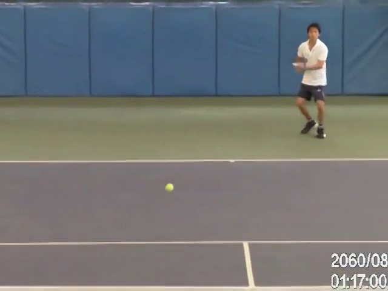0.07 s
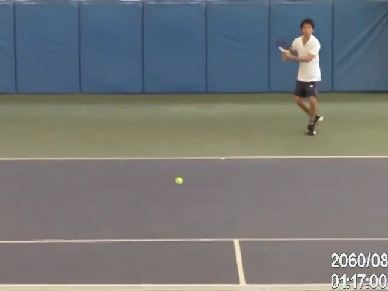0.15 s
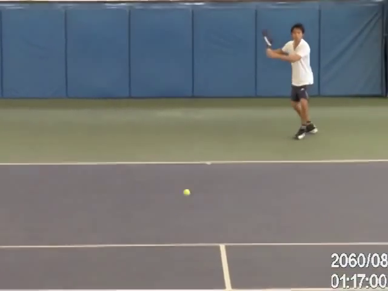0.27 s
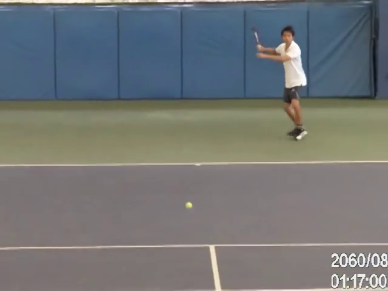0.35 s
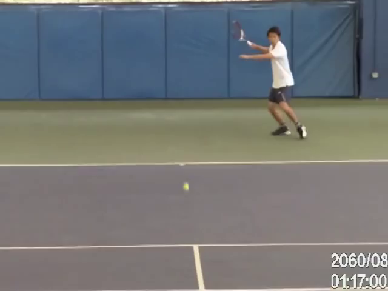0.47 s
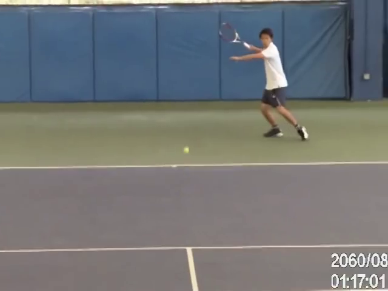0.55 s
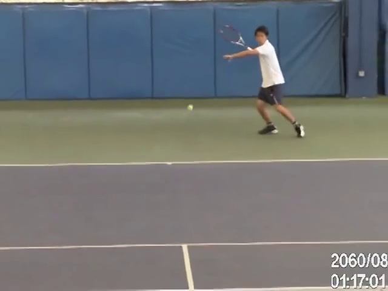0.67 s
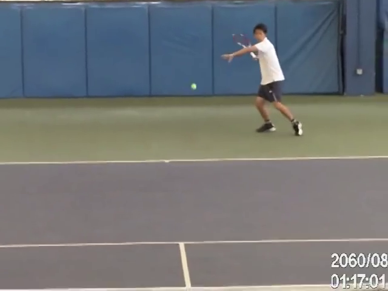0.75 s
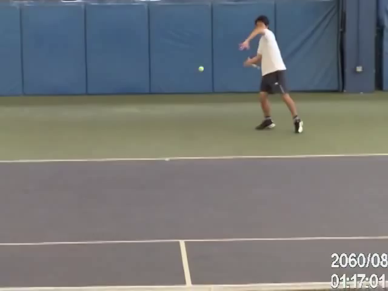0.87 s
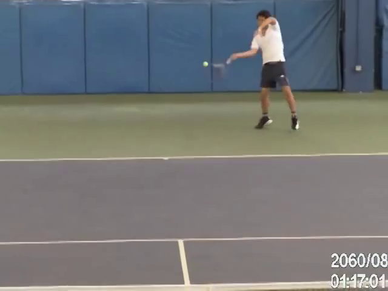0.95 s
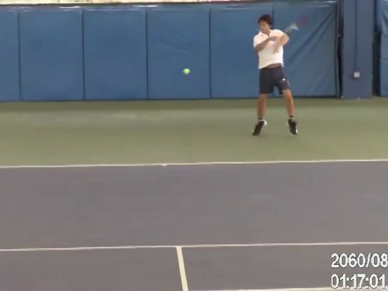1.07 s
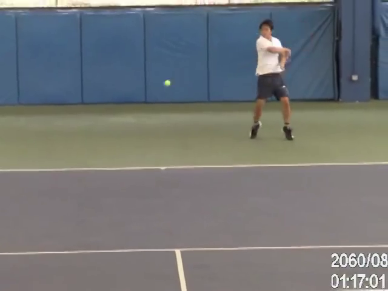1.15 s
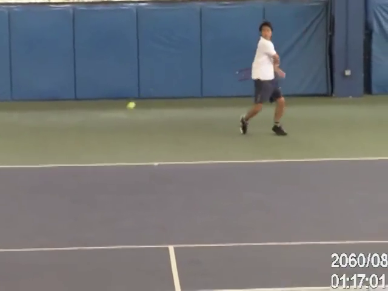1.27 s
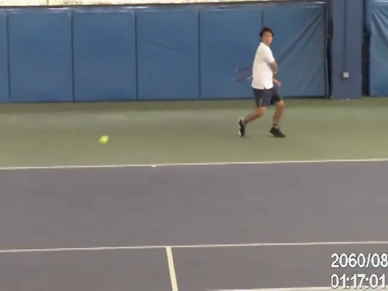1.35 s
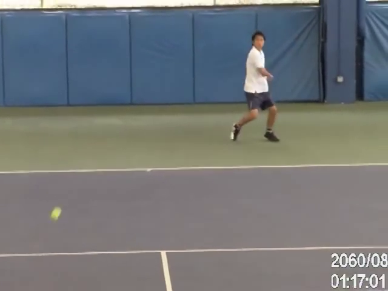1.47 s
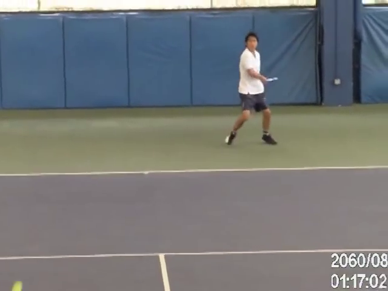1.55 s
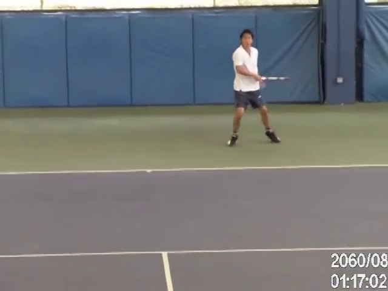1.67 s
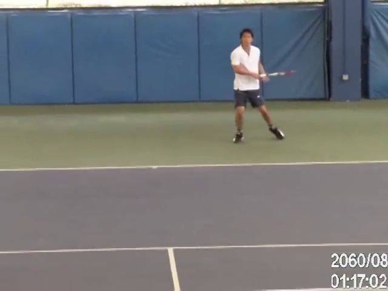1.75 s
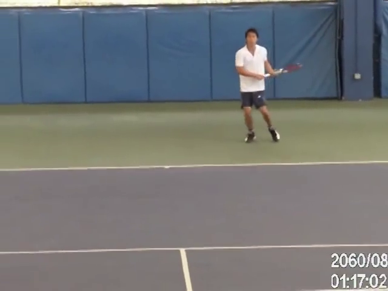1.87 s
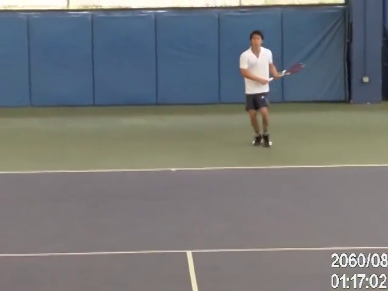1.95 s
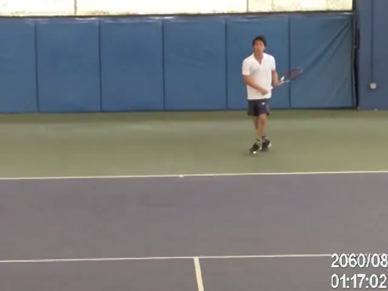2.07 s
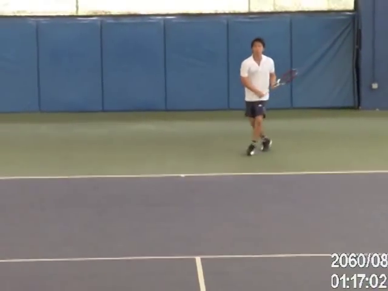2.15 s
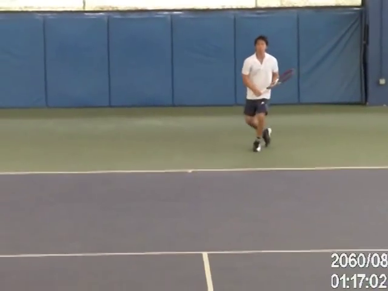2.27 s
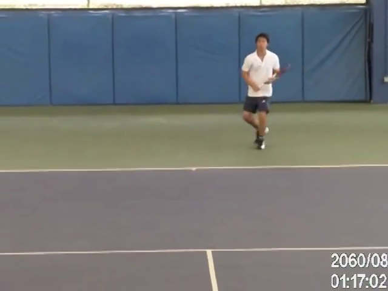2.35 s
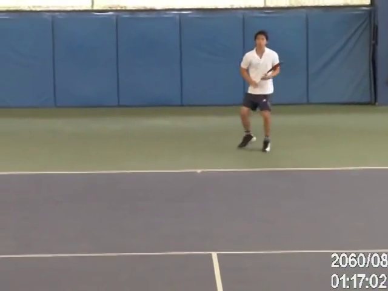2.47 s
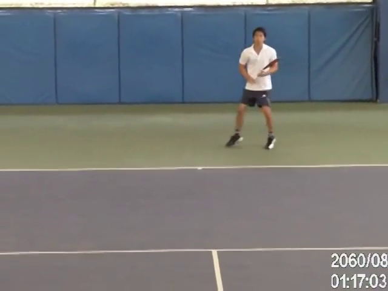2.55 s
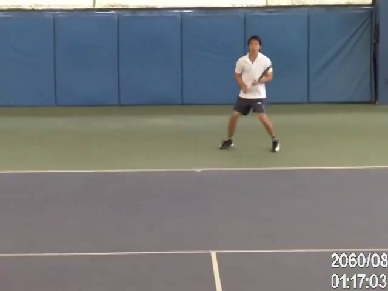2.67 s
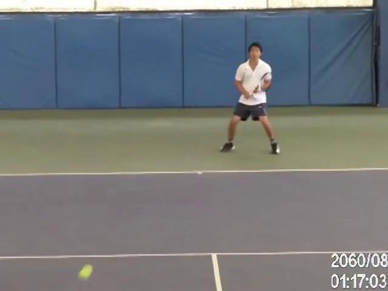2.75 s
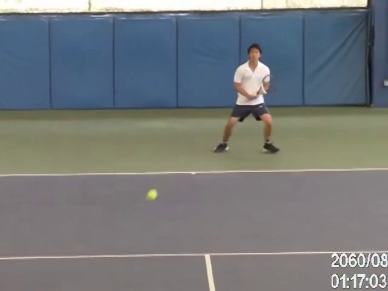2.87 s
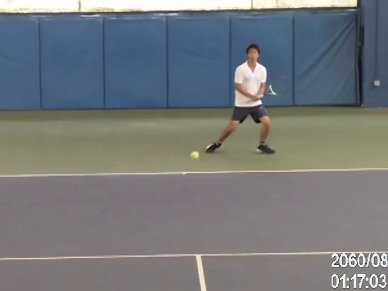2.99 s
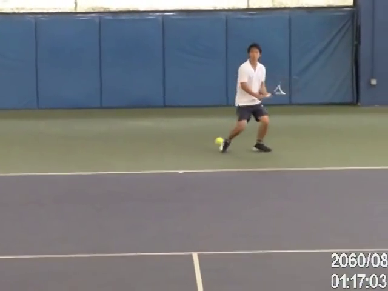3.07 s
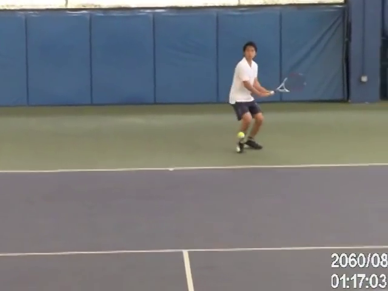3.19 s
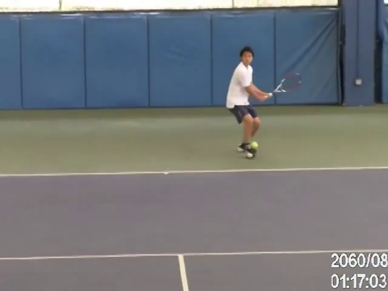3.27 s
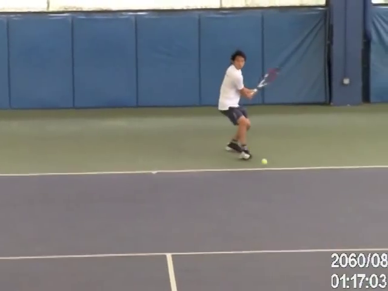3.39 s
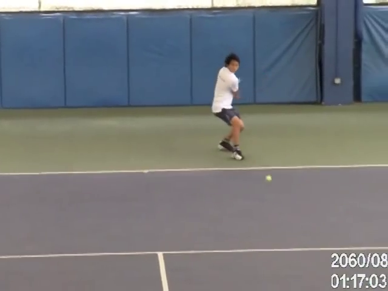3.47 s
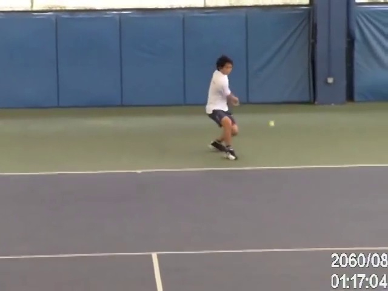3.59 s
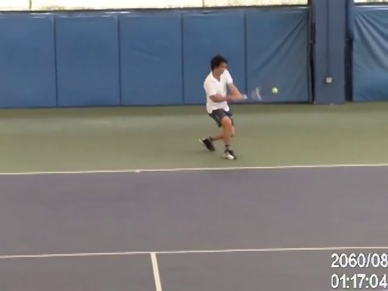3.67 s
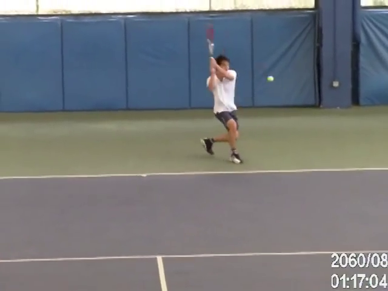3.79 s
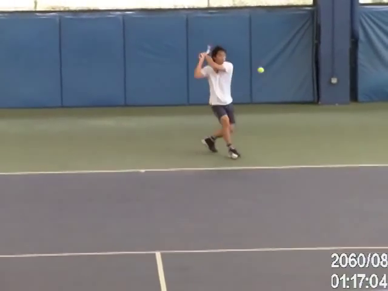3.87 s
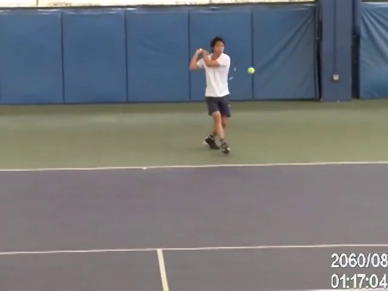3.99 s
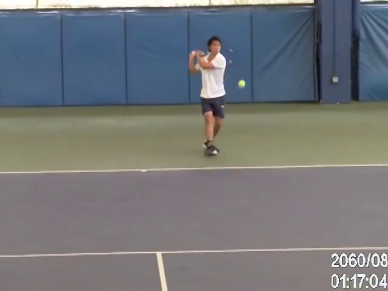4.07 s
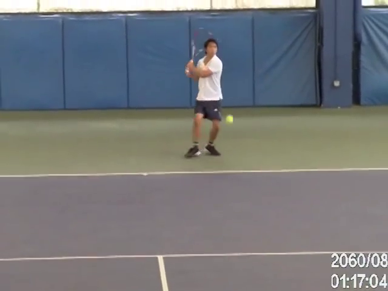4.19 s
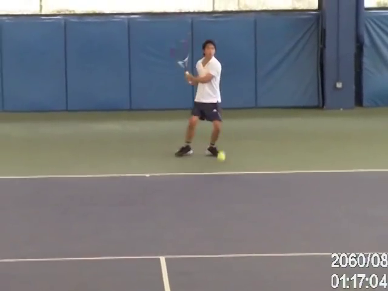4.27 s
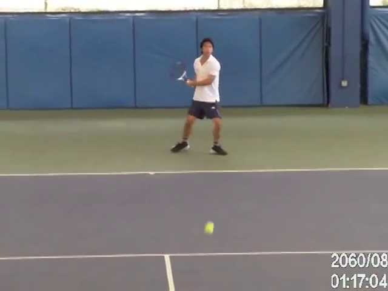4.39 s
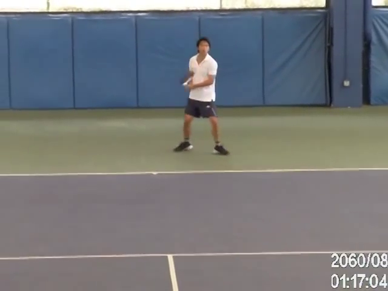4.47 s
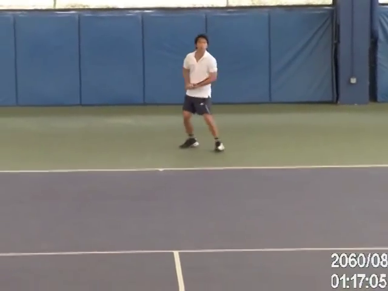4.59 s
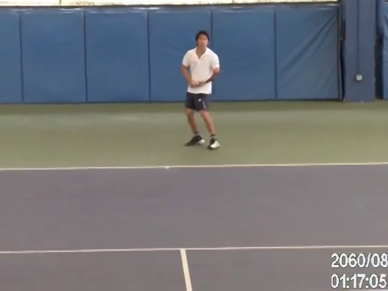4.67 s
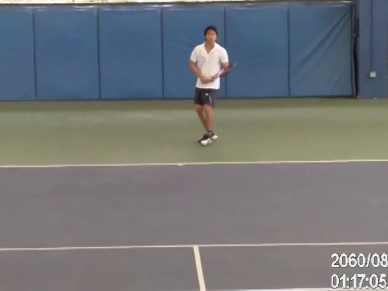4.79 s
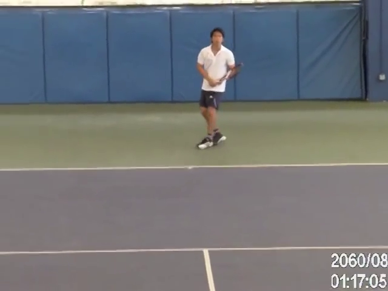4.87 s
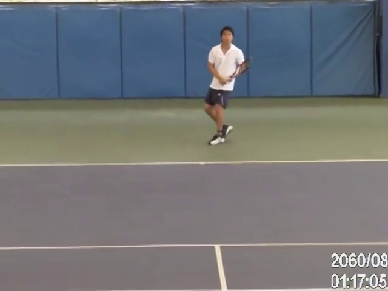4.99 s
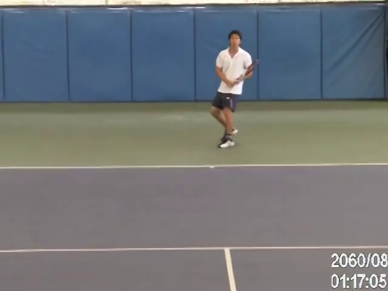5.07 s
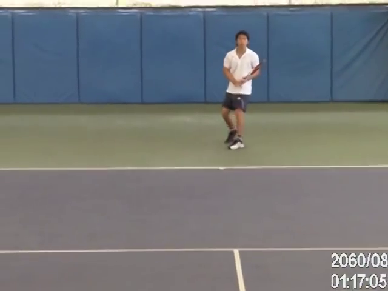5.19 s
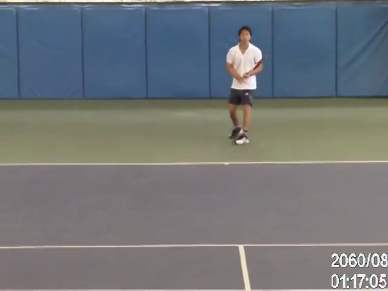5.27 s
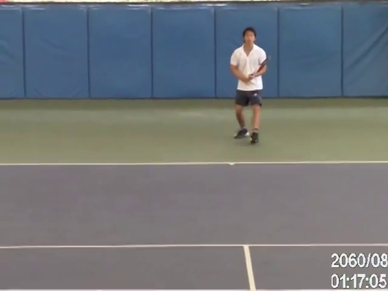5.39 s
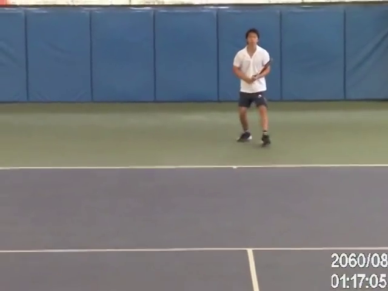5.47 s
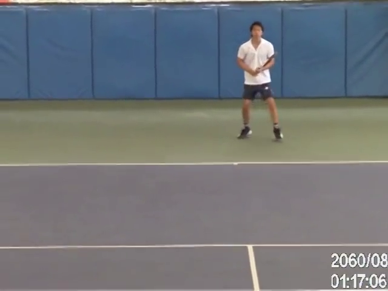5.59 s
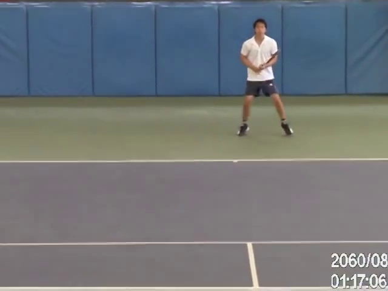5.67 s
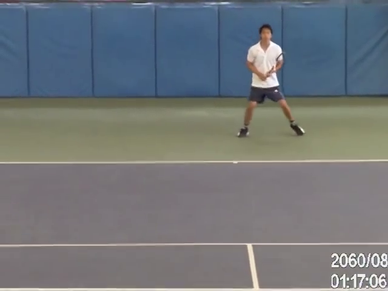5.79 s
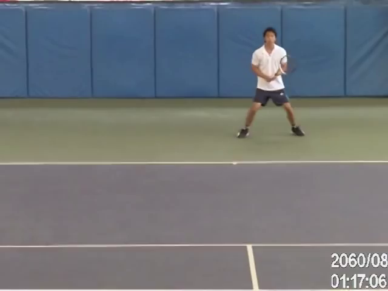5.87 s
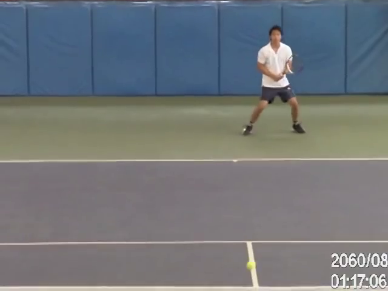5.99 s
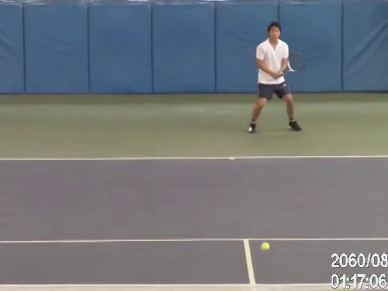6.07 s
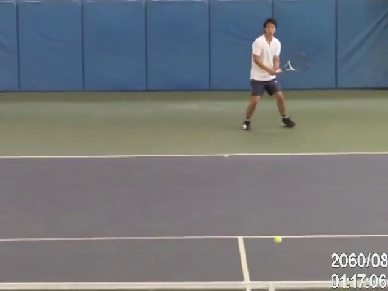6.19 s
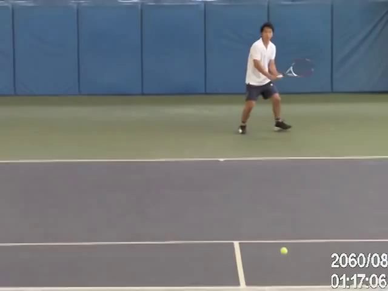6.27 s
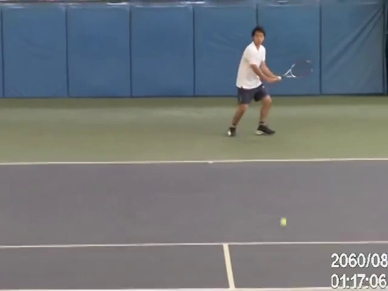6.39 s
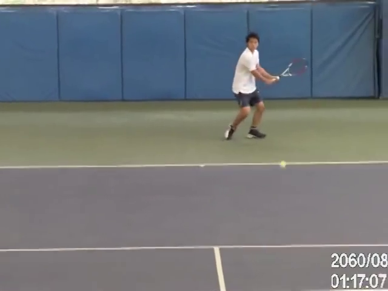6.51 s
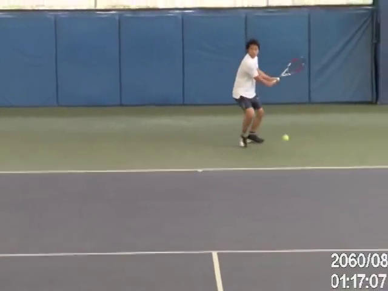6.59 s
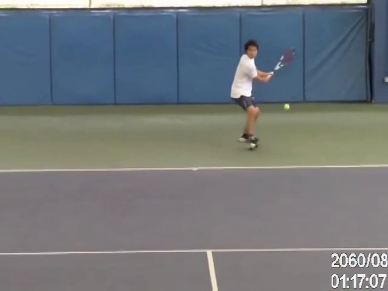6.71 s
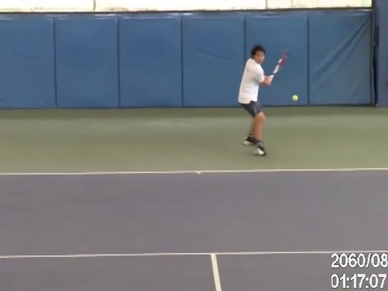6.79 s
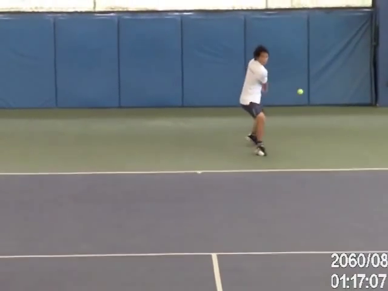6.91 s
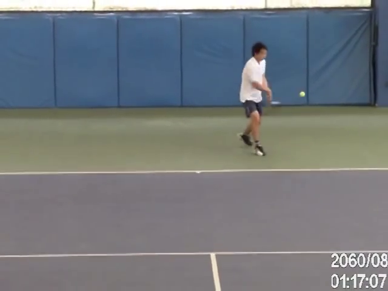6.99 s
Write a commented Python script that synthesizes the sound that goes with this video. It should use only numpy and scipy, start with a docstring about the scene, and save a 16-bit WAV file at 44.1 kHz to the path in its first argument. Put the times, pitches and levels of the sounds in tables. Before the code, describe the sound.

Over constant airy hiss, a ball is struck alternately far and loudly near, bouncing dully between, with gritty shoe scuffs and long hall ringing.

```python
"""A tennis rally in a large hall, heard by two small close-set microphones behind one baseline.
First an earlier stroke rings on over ventilation hiss that lasts throughout; shoes scuff, the ball bounces twice.
Then far, near, far and near strokes follow, with bounces and scuffs between and a faint whistle before each near one.
Each stroke is a noise crack and a decaying hollow pop, with single echoes and dense noise for the hall.
Bounces are dull pops, scuffs and one far-wall return are treble puffs; scuffs and hall remain at the end."""
import sys
import numpy as np
from scipy import signal
from scipy.fft import rfft, irfft
from scipy.io import wavfile
from scipy.ndimage import uniform_filter1d

SR = 44100
rng = np.random.default_rng(int(sys.argv[2]) if len(sys.argv) > 2 else 0)


def unload_audio(sound):
    """Save the sound as a 16-bit wav file, at the path given as the first command line argument."""
    columns = np.transpose(np.atleast_2d(sound))
    # keep every value between -1 and 1, then stretch to whole-number steps
    steps = np.round(np.clip(columns, -1, 1) * 32767)
    wavfile.write(sys.argv[1], SR, steps.astype(np.int16))


N = 310464


def strokes():
    """A racket blow sends out crack, pop and thump; floor, walls and hall throw crack and pop back."""
    # Strokes at either end; where the ball meets the strings sets knocks and hollow tones: (time [s],
    # end of the court, crack level [dB], crack tilt on a path of no length [dB/octave],
    # knock before bending [Hz], its level over the snap on a path of no length [dB],
    # upper knock and its level likewise [Hz], [dB],
    # pop peak [dB], hollow tone before bending [Hz], upper tone likewise [Hz], upper tone over lower [dB],
    # thump level [dB], echo crack offset, of which pops take half [dB], hall level [dB])
    blows = [(1.0968, "far", -16, -2, 2210, 1, 2840, 0, -7.5, 780, 990, -4, -42, 2, -21.5),
             (2.462, "near", -3, -1, 4270, 2, 5060, 0, -3, 775, 1050, -4.5, -15, -0.5, -25.5),
             (3.791, "far", -20, -1.5, 2130, 10.5, 4520, 0, -10.5, 747, 1110, -11, -46, 4.5, -22.5),
             (5.5714, "near", -5.5, -0.5, 4600, -11, 8020, 1, -8.5, 760, 1010, -1, -15.5, 2, -29.5)]
    # Single echoes from floor, walls and opposite end, by end of the court:
    # (delay [s], crack against direct before the offset [dB], pop against direct before the offset [dB])
    echo_paths = {"far": [(.0027, 5.5, 0), (.0135, -1, -6), (.031, -9, -9), (.036, -9, -20),
                  (.039, -3, -17), (.0437, -6, 2), (.049, -9, -4), (.055, -10, -4), (.063, -11, -8),
                  (.072, -12, -5)], "near": [(.005, -8, -1), (.009, -16, -6), (.013, -15, -4),
                  (.017, -19, -6), (.0215, -19, -7), (.034, -26, -10), (.053, -24, -11), (.182, -19, -22),
                  (.192, -22, -20)]}
    # Swells of dense reflections, by end; near strokes come back late from the far wall:
    # (delay [s], rise [s], level [dB], share of the hall t60 [1], hollow tone over the colour [dB])
    reflections = {"far": [(.007, 0.0075, 0, 1, 16.5), (.036, 0.02, 5.5, 0.13, 8)],
                   "near": [(0.015, 0.014, 7, 0.25, 14), (0.21, 0.043, 2.5, 1, 14),
                   (0.19, 0.027, 7.5, 0.18, -12)]}
    # Crack echoes no later than this belong to the blow and take no offset, by end: delay [s]
    blow_end = {"far": .004, "near": 0}
    crack_s = 0.0015  # on a path of no length
    smear = 1.3  # share by which the crack grows along a 14 ms path
    bend_share = .05  # bound on the shift of hollow tones; knocks take its fourth power
    linger_db = -31.5

    out = np.zeros((2, N))
    for (s, end, crack_db, tilt_db, knock_hz, knock_db, high_knock_hz, high_knock_db,
         pop_db, low_hz, high_hz, high_db, thump_db, echo_db, hall_db) in blows:
        paths = [(0.00053, 0, 0)]  # direct sound
        for delay, path_crack_db, path_pop_db in echo_paths[end]:
            offset_db = echo_db * (delay > blow_end[end])
            paths.append((delay, path_crack_db + offset_db, path_pop_db + .5 * echo_db))

        for delay, path_crack_db, path_pop_db in paths:
            late = np.sqrt(delay / 0.014)  # longer paths smear and dull the crack
            # pitches shift at random from path to path
            bend = 1 + bend_share * min(late, 1) * rng.uniform(-0.8, 1, 4)
            knocks = [(knock_hz * bend[0] ** 4, knock_db - 4 * late),
                      (high_knock_hz * bend[1] ** 4, high_knock_db - 4 * late)]
            snap = crack(crack_s * (1 + smear * late), tilt_db - 0.67 * late, knocks)
            add(out, s + delay, gain_of(crack_db + path_crack_db) * snap)
            hollow = pop(low_hz * bend[2], high_hz * bend[3], high_db)
            # the ball springs back just after the crack
            add(out, s + delay + 0.00123, gain_of(pop_db + path_pop_db) * hollow)

        add(out, s, gain_of(thump_db) * thump())
        add(out, s, gain_of(hall_db) * hall(reflections[end], low_hz, high_hz, high_db))

    # the hall still rings from a stroke before the start
    add(out, 0, gain_of(linger_db) * hall([(-0.27, .03, 5.9, 0.89, 10.0)], 770, 1080, -2.5))
    return out


def crack(length, tilt_db, knocks):
    """Strings and felt snap: a short burst of bright noise, a ragged tail and rough knocks of the frame."""
    # Colour of the snap before its tilt: (frequency [Hz], level per Hz [dB])
    snap_colour = [(400, -26), (1000, -6), (2000, -3), (3500, -2), (5000, 0), (6200, -12), (7500, -1),
                   (11000, -2), (15000, -8)]
    rattle_db, rattle_s = -12, .007  # tail under the blow, and its time to fall to 1/e

    t = np.arange(2048) / SR
    rise = 1 - np.exp(-t / .0006)
    blow = np.exp(-(t / length) ** 2)
    rattle = gain_of(rattle_db) * np.exp(-t / rattle_s)

    def colour(hz):
        return read(snap_colour, hz) + tilt_db * np.log2(np.maximum(hz, 400) / 4000)

    snap = hiss(len(t), colour) * (blow + rattle)
    for hz, db in knocks:
        # fast pitch waver makes the knock rough
        waver = 1 + .11 * evened(uniform_filter1d(rng.standard_normal((2, len(t))), 7))
        cycles = np.cumsum(hz * waver, 1) / SR + rng.random((2, 1))
        snap = snap + gain_of(db) * blow * np.sin(2 * np.pi * cycles)
    return ahead(snap * rise, -15)


def pop(low_hz, high_hz, high_db):
    """The hollow ball and the frame ring in a few quickly dying modes after a soft squeeze."""
    # Overtones of ball and frame: (frequency [Hz], level against the low tone [dB], t60 [s])
    overtones = [(1560, -5.5, 0.013), (2370, -18, 0.0056)]
    hollow_t60 = .022  # s

    t = np.arange(2048) / SR
    modes = [(low_hz, 0, hollow_t60), (high_hz, high_db, hollow_t60)] + overtones
    ring = sum(gain_of(db - 60 * t / t60) * np.sin(2 * np.pi * hz * t) for hz, db, t60 in modes)
    ring *= (1 - np.exp(-t / 0.00073)) ** 2  # soft squeeze
    return ahead(np.array([ring, -ring]) / abs(ring).max(), -13)


def thump():
    """The racket frame flexes at a low pitch and dies within a few cycles."""
    flex_hz, flex_t60 = 271, 0.017  # Hz, s
    t = np.arange(4096) / SR
    flex = np.sin(2 * np.pi * flex_hz * t) * (1 - np.exp(-t / 0.001)) * gain_of(-60 * t / flex_t60)
    return ahead(np.array([flex, flex]), -6)


def hall(swells, low_hz, high_hz, high_db):
    """Dense reflections carry the hollow tones in swells; each band then dies at its own speed."""
    # Decay of the hall: (frequency [Hz], t60 [s])
    decay = [(200, 0.32), (500, 5.07), (800, 3.5), (1500, 9), (3000, 4.1), (6000, 2.1), (12000, 2)]
    # What a stroke feeds the hall: (frequency [Hz], level per Hz [dB])
    feed = [(100, -56), (200, -19), (400, -11.5), (620, -12), (900, -6), (1500, -13.5), (2500, -13.5),
            (5000, -14.5), (7000, -19), (15000, -26.5)]
    ring_width_hz = 82  # hollow tones as the hall carries them
    upper_fade_db_per_s = 11  # the upper tone leaves the hall sooner

    hz, t, z = signal.stft(hiss(3 * SR, lambda hz: read(feed, hz)), SR, nperseg=512)
    lower = peak(hz, low_hz, ring_width_hz)[:, None]
    upper_gain = gain_of(high_db + 1.0 - upper_fade_db_per_s * t)
    ring = lower + upper_gain * peak(hz, high_hz, ring_width_hz)[:, None]

    power = 0
    for delay, rise, db, share, hollow_db in swells:
        age = np.maximum(t - delay, 0)
        t60 = (share * read(decay, hz))[:, None]
        fade = gain_of(2 * (db - 60 * age / t60)) * (1 - np.exp(-age / rise)) ** 2
        power = power + fade * (1 + gain_of(2 * hollow_db) * ring ** 2)
    return ahead(signal.istft(z * np.sqrt(power), SR, nperseg=512)[1], -2.9)


def bounces():
    """The ball hits the court with a dull pop, a tick and a little hall."""
    # Bounces on the court: (time [s], pop peak [dB], hollow tone [Hz], tick against the pop peak [dB])
    landings = [(0.328, -31, 1010, -12), (0.58, -16.5, 895, -16), (1.575, -15, 760, -12),
                (3.225, -14, 827, -16), (3.58, -19, 805, -14), (4.88, -17.5, 930, -3),
                (5.356, -16.5, 1050, -18)]
    hall_db = -28  # against the pop peak

    out = np.zeros((2, N))
    for s, db, hz, tick_db in landings:
        tones = hz, 1.41 * hz, -5
        tick = gain_of(tick_db) * crack(.002, -3, [(2200, -4)])
        add(out, s, gain_of(db) * (pop(*tones) + tick))
        add(out, s, gain_of(db + hall_db) * hall([(.012, .02, 0, 0.19, 12)], *tones))
    return out


def scuffs_and_return():
    """Soles drag over gritty paint and the far wall returns a stroke: treble puffs that swell and fade."""
    # Shoe scuffs, and at 2.642 s a broad return of the near stroke from the far wall:
    # (time [s], level [dB], rise [s], lower edge [Hz])
    puffs = [(.0, -39, 0.027, 5000), (0.311, -33, 0.027, 3000), (0.899, -36, .02, 6000),
             (1.551, -35, 0.012, 5000), (1.848, -28.5, 0.02, 5960), (1.981, -27.5, 0.0016, 6460),
             (2.598, -20.5, 0.022, 4400), (2.642, -26.5, 0.059, 3000), (2.961, -32, 0.032, 6500),
             (3.26, -38, 0.024, 6000), (3.42, -31.5, 0.044, 5030), (3.464, -32.5, 0.026, 5000),
             (3.576, -25.5, 0.026, 6000), (4.609, -25, 0.022, 7500), (4.791, -28, 0.023, 8060),
             (4.845, -33, 0.043, 6000), (4.93, -34.5, .028, 7000), (5.734, -21.5, 0.031, 8950),
             (5.75, -38, .006, 4300), (6.009, -25.5, .005, 7400), (6.861, -36, 0.03, 4900)]
    top_hz = 14200
    usual_t60, usual_rise = 0.2, 0.025  # s; slower puffs fade longer

    out, t = np.zeros((2, N)), np.arange(16384) / SR
    for s, db, rise, low_hz in puffs:
        def colour(hz):
            return -10 * np.log10((1 + (low_hz / (hz + 1)) ** 8) * (1 + (hz / top_hz) ** 8))

        t60 = usual_t60 * np.sqrt(rise / usual_rise)
        rush = hiss(len(t), colour)
        grit = gain_of(1.5 * evened(uniform_filter1d(rng.standard_normal(len(t)), 30)))
        onset = np.sin(np.pi / 2 * np.clip(t / rise, 0, 1))
        swell = onset * gain_of(db - 60 * np.maximum(t - rise, 0) / t60)
        add(out, s, swell * rush * grit)
    return ahead(out, -7.0)


def swings():
    """The near racket whistles: a wavering tone with an airy edge swells and dies before the stroke."""
    # Swings of the near racket: (time [s], length [s], level [dB])
    whistles = [(2.32, 0.126, -32), (5.404, 0.133, -32.5)]
    whistle_hz, rise_s = 994, 0.018  # mean pitch; straight rise under a rounded window

    out = np.zeros((2, N))
    for s, length, db in whistles:
        t = np.arange(0, length, 1 / SR)
        waver = evened(uniform_filter1d(rng.standard_normal(SR), 900))[:len(t)]
        tone = np.sin(2 * np.pi * np.cumsum(whistle_hz * (1 + 0.0073 * waver)) / SR)
        edge = hiss(SR, lambda hz: 20 * np.log10(peak(hz, whistle_hz, 60)))[:, :len(t)]
        swell = np.minimum(t / rise_s, 1) * signal.windows.tukey(len(t), .2)
        add(out, s, gain_of(db) * (0.98 * tone + 0.5 * edge) * swell)
    return out


def ventilation():
    """Moving air makes a wide hiss with drifting patches, broad bands and faint thin steady lines."""
    # Colour of the hiss: (frequency [Hz], level per Hz [dB])
    air_colour = [(35, -74), (60, -33.5), (189, -17), (233, -19.5), (262, -13.5), (408, -14), (448, -19),
                  (492, -5.5), (767, -0.5), (1580, -2), (1780, -4), (2580, -4), (5860, -13), (14600, -19.5),
                  (16000, -69)]
    # Thin lines and broad bands in the hiss: (frequency [Hz], width [Hz], level [dB])
    lines_and_bands = [(2655, 11, -44), (3008, 16, -52), (3294, 16, -51), (3517, 16, -52), (3738, 16, -52),
                       (2543, 83, -41), (3190, 1030, -37.5), (4610, 980, -43.5)]
    air_db = -27.5

    hz, t, z = signal.stft(hiss(N + SR, lambda hz: read(air_colour, hz)), SR, nperseg=512)
    patches = rng.standard_normal(z.shape[1:])
    patches = evened(uniform_filter1d(uniform_filter1d(patches, 8, 0), 14, 1))
    air = signal.istft(z * gain_of(1.28 * patches), SR, nperseg=512)[1][:, :N]
    out = gain_of(air_db) * evened(air)
    for centre_hz, width_hz, db in lines_and_bands:
        out += gain_of(db) * hiss(N, lambda hz: 20 * np.log10(peak(hz, centre_hz, width_hz)))
    return out


def gain_of(db):
    """Decibels to an amplitude factor."""
    return 10 ** (np.asarray(db) / 20)


def evened(x):
    """Scales to rms 1 over all rows together."""
    return x / np.sqrt(np.mean(x ** 2) + 1e-20)


def read(points, hz):
    """Reads a spectrum on a log-frequency axis."""
    f, value = np.transpose(points)
    return np.interp(np.log(hz + 1), np.log(f + 1), value)


def peak(hz, centre_hz, width_hz):
    """Amplitude bell around a centre, top 1, with its full width at half amplitude."""
    return 1 / (1 + (2 * (hz - centre_hz) / width_hz) ** 2)


def coloured(x, db_of):
    """Filters rows by a gain in dB given as a function of frequency."""
    size = x.shape[-1]
    return irfft(rfft(x) * gain_of(db_of(np.fft.rfftfreq(size, 1 / SR))), size)


def hiss(size, db_of):
    """Two unrelated coloured noises of joint rms 1: one for the mid, one for the side."""
    return evened(coloured(rng.standard_normal((2, size)), db_of))


def ahead(x, side_db):
    """Sound from ahead reaches both microphones more alike: the side row is scaled down."""
    return x * [[1], [gain_of(side_db)]]


def add(mix, s, sound):
    """Mixes a mid-and-side sound in at time s, cut at the end of the mix."""
    part = mix[:, round(s * SR):][:, :sound.shape[1]]
    part += sound[:, :part.shape[1]]


def scene():
    """Two close microphones hear the bass alike and the treble apart."""
    # Gain of the side signal: (frequency [Hz], level [dB])
    width = [(60, -23), (100, -27), (180, -40), (310, -24), (550, -20), (950, -20.5), (1650, -19.5),
             (2860, -10), (4970, -4), (8640, 4), (15000, 3.5)]
    # The microphones differ a little: (frequency [Hz], left minus right [dB])
    lean = [(60, 1), (240, -0.5), (950, 0), (3770, -0.5), (15000, 1)]
    mid, side = strokes() + bounces() + scuffs_and_return() + swings() + ventilation()
    side = coloured(side, lambda hz: read(width, hz))
    left_right = np.array([mid + side, mid - side])
    return coloured(left_right, lambda hz: read(lean, hz) * [[.5], [-.5]])


def record(dry):
    """Gain control ducks loud strokes and recovers; soft clipping; small microphones lose bass; band limit."""
    edge_hz = 15280
    # power of both channels over the last 3 ms
    power_db = 10 * np.log10(abs(uniform_filter1d((dry ** 2).mean(0), 131, origin=65)) + 1e-12)
    fall = np.arange(N) * 60. / SR  # held peaks sink by 60 dB a second
    held_db = np.maximum.accumulate(power_db + fall) - fall
    over_db = np.maximum(held_db + 15, 0)  # excess over -15 dB
    slow = np.exp(-1 / (0.0039 * SR))  # the gain takes a few milliseconds to move
    cut_db = .62 * signal.lfilter([1 - slow], [1, -slow], over_db)
    ducked = np.tanh(dry / gain_of(cut_db))
    thin = signal.sosfilt(signal.butter(2, 240, "high", fs=SR, output="sos"), ducked)
    band_limit = signal.firwin(511, edge_hz, window=("kaiser", 9), fs=SR)
    return signal.oaconvolve(thin, band_limit[None], "same")


dry = scene()
out = record(dry)
unload_audio(out)
```